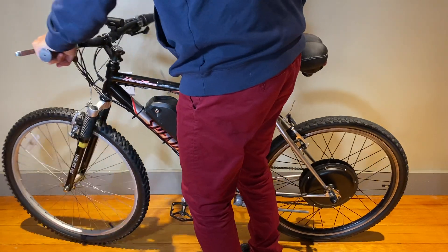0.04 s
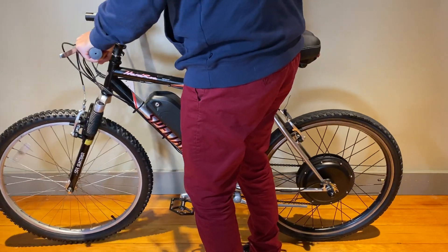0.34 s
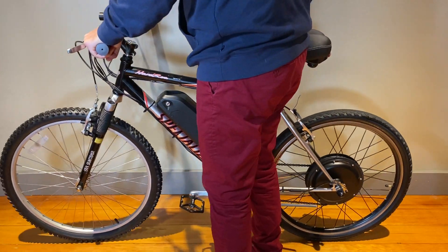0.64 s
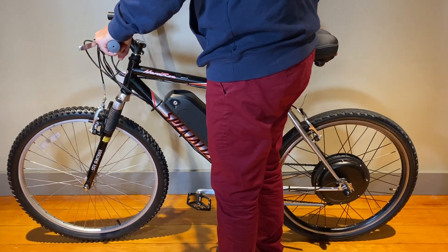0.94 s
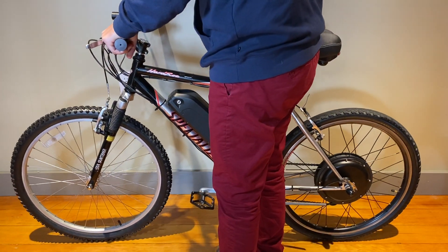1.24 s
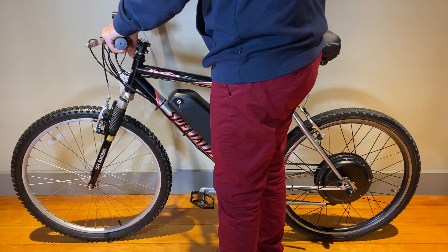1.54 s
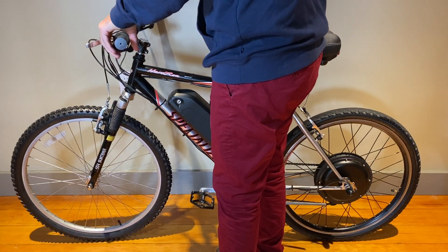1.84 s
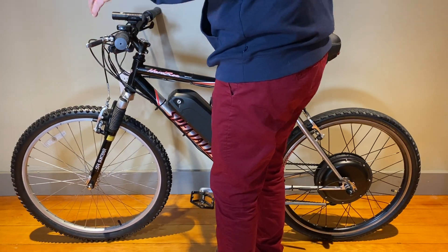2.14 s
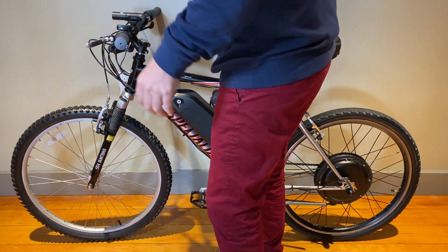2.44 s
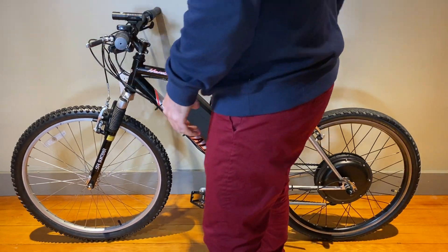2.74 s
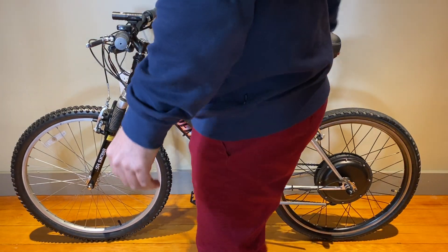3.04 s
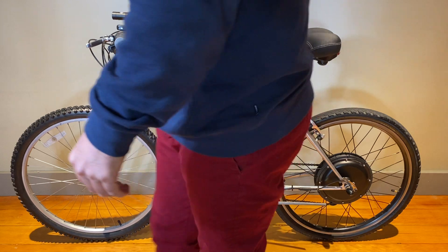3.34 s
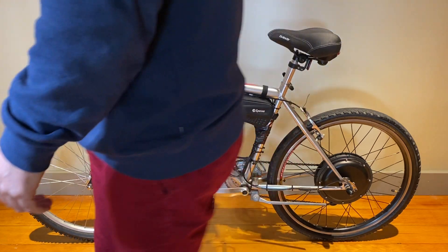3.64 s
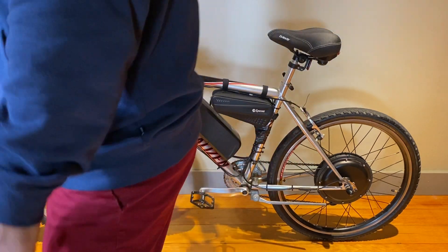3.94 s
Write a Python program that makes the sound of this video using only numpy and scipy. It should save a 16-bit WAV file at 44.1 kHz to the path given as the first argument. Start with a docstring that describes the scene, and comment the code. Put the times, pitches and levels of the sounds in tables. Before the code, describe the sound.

A bicycle bumps against a wall with a thud and a metallic tick, then settles with faint creaks. After a softer bump, someone steps away on wooden boards, clothes rustling nearby, ending with a hard shoe clack.

```python
"""Over the low rumble of a room with a wooden floor, a bicycle is leaned on a wall: the handlebar bumps,
the frame and the boards ring in their modes, and a metal part ticks. The frame settles with faint creaks
and rattles, and two softer bumps follow. The rider lets go, a sleeve sliding with a faint whistle, and
steps away in clothes that rustle by friction. Soft steps make the boards boom, and the last one lands
with a hard clack that rings a plank."""
import sys
import numpy as np
from scipy import signal
from scipy.fft import rfft, irfft, next_fast_len
from scipy.io import wavfile
from scipy.ndimage import map_coordinates

SR = 44100
rng = np.random.default_rng(int(sys.argv[2]) if len(sys.argv) > 2 else 0)


def wav_out(sig):
    """Save sig, one row per channel (or a flat mono array), as 16-bit PCM at SR to the path in sys.argv[1]."""
    wavfile.write(sys.argv[1], SR, np.round(np.clip(np.atleast_2d(sig).T, -1, 1) * 32767).astype(np.int16))


N = 176400

# handlebar blows (time [s], level [dB], treble corner [Hz], frame ring [dB], floor boom [dB])
HANDLEBAR_BUMPS = [(0.1644, -36.5, 2870, -39, -45.5), (0.206, -41, 3500, -48.5, -66),
                   (2.207, -48.5, 1240, -73, -77), (2.228, -45, 980, -64, -74)]
# soft footfalls (time [s], level [dB], treble corner [Hz], floor boom [dB])
SOFT_STEPS = [(2.5408, -34.5, 307, -46.5), (2.692, -47, 170, -43.5), (2.934, -53.5, 200, -56),
              (3.5, -33.5, 376, -46)]
# hollow note of a sole landing (frequency [Hz], level [dB], t60 [s])
SOLE_MODES = [(201.5, -3.5, 0.18), (257.8, 2, .24), (285, 1, 0.19), (379.4, -6.5, 0.15)]
# hard shoe contacts (time [s], level [dB], floor boom [dB])
SHOE_CLACKS = [(3.7621, -37.5, -63), (3.7638, -27, -40.5)]


def amp(db):
    """Decibels to amplitude ratio."""
    return 10 ** (np.asarray(db) / 20)


def unit(x):
    """Normalise to rms 1."""
    return x / np.sqrt(np.mean(x ** 2) + 1e-20)


def pan(left_db):
    """Level difference: stereo gains with the left louder by left_db."""
    return amp([[left_db / 2], [-left_db / 2]])


def along(points, hz):
    """Interpolate (frequency [Hz], value) points on a logarithmic frequency axis."""
    knots_hz, values = np.transpose(points)
    return np.interp(np.log(hz + 1), np.log(knots_hz + 1), values)


def wobble(rate):
    """Random modulation: a smooth curve with rate knots a second."""
    knots = rng.standard_normal(int(N * rate / SR) + 4)
    return map_coordinates(knots, [np.arange(N) * rate / SR])


def coloured(x, gain_db):
    """Minimum-phase filtering: folding the cepstrum makes the response gain_db(hz) causal."""
    size = 2 * next_fast_len(x.shape[-1])
    hz = np.fft.rfftfreq(size, 1 / SR)
    cepstrum = irfft(np.log(amp(gain_db(hz)) + 1e-6), size)
    cepstrum[1:size // 2] *= 2
    cepstrum[size // 2 + 1:] = 0
    return irfft(rfft(x, size) * np.exp(rfft(cepstrum)), size)[..., :x.shape[-1]]


def diffuse(size):
    """Diffuse field: stereo noise, coherent in the bass and largely unrelated in the treble."""
    # likeness of left and right (frequency [Hz], correlation [ratio])
    coherence = [(60, 0.92), (150, 0.88), (280, 0.73), (550, 0.26), (2000, 0.14), (5000, 0.36),
                 (9000, 0.25), (15000, 0.27)]
    angle = np.arccos(np.clip(along(coherence, np.fft.rfftfreq(size, 1 / SR)), -1, 1)) / 2
    mid, side = irfft(rfft(rng.standard_normal((2, size))) * [np.cos(angle), np.sin(angle)], size)
    return np.array([mid + side, mid - side])


def shaped_noise(spectrum):
    """Source and filter: diffuse noise given a spectrum, at rms 1."""
    return unit(coloured(diffuse(N), lambda hz: along(spectrum, hz)))


def add(out, time, x):
    """Superposition: mix x into out from the given time."""
    start = int(np.clip(round(time * SR), 0, N - 1))
    out[:, start:start + x.shape[-1]] += x[..., :N - start]


def contact(gain_db, ring_t60, ring_db, room_db, pan_db):
    """Impulse response of a blow: a pulse, the body's short dense ring and the room's reverberation."""
    # reverberation time of the room (frequency [Hz], t60 [s])
    room_t60 = [(60, 0.93), (200, 0.56), (500, 0.6), (1200, 0.6), (3000, 0.39), (7000, 0.46), (15000, 0.14)]
    t = np.arange(SR) / SR
    hz, frame_times, spectra = signal.stft(diffuse(SR), SR, nperseg=256)
    decay = amp(-60 * frame_times / along(room_t60, hz)[:, None])
    tail = signal.istft(spectra * decay, SR, nperseg=256)[1][:, :SR]
    tail *= 1 - np.exp(-t / 0.002)
    ring = diffuse(SR) * amp(-60 * t / ring_t60)
    blow = (amp(ring_db) * unit(ring) + amp(room_db) * unit(tail)) / np.sqrt(SR)
    blow[:, 0] += 1  # the direct pulse
    return unit(coloured(blow, gain_db)) * pan(pan_db) / np.sqrt(50)  # energy of 20 ms at rms 1


def softened(spectrum, hz, corner_hz):
    """Compliance: a soft contact loses 12 dB an octave above the corner."""
    return along(spectrum, hz) - 10 * np.log10(1 + (hz / corner_hz) ** 4)


def ringing(modes, rise_s):
    """Free vibration: damped modes swell briefly, each with about 1 dB of random spread."""
    t = np.arange(SR) / SR
    partials = (amp(db + rng.normal(0, 1) - 60 * t / t60) * np.sin(2 * np.pi * hz * t)
                for hz, db, t60 in modes)
    return sum(partials) * (1 - np.exp(-(t / rise_s) ** 2))


def room_tone():
    """Stationary noise: the steady low rumble of the room."""
    # rumble spectrum (frequency [Hz], gain [dB])
    rumble_spectrum = [(15, -47.5), (25, -20), (43, -8), (57, 1.5), (75, -8.5), (97, -2), (150, -10),
                       (250, -10.5), (400, -19.5), (600, -23.5), (840, -21), (1400, -43), (4000, -53.5),
                       (16000, -47.5)]
    return amp(-64.5) * pan(2.2) * shaped_noise(rumble_spectrum)


def clothes():
    """Friction noise: sleeves and trousers rub with a fine grain, a little to the left."""
    # rustle envelope (time [s], level [dB])
    rustle_levels = [(0, -62.5), (.14, -66.5), (.28, -67), (.45, -71), (.8, -77), (1.3, -79.5),
                     (2.039, -78), (2.17, -72), (2.36, -70), (2.55, -68.5), (2.74, -69), (2.87, -61.5),
                     (3.13, -68), (3.311, -69), (3.46, -64), (3.6, -61.5), (3.74, -50.5), (3.85, -51),
                     (4.0, -56)]
    # spectrum of rubbing cloth (frequency [Hz], gain [dB])
    cloth_spectrum = [(100, -5.5), (400, 13.5), (1000, 8.5), (2000, 1), (4000, -2.5), (6500, -5),
                      (10000, -13.5), (14500, -11.5), (16000, -22)]
    times, levels = np.transpose(rustle_levels)
    grain_db = 0.6 * wobble(25) + 0.9 * wobble(300)
    envelope = amp(np.interp(np.arange(N) / SR, times, levels) + grain_db)
    return envelope * shaped_noise(cloth_spectrum) * pan(2.5)


def handlebar():
    """Impact excitation: the handlebar thuds on the wall and sets the frame's modes ringing."""
    # spectrum of the thud (frequency [Hz], gain [dB])
    bump_spectrum = [(40, -11.5), (110, -4.5), (280, 0), (450, -6), (850, -3.5), (1200, -10.5),
                     (2200, -12.5), (3500, -21.5), (8000, -30), (16000, -72)]
    # bicycle frame modes (frequency [Hz], level [dB], t60 [s])
    frame_modes = [(137.3, 0.5, 0.42), (281.4, 1, 0.34), (366, -7, 0.2), (522, -34, 0.51), (800, -43, 0.52),
                   (815, -8.5, .3), (865, -12, 0.46), (1320, -16, 0.27), (1702, -10, 0.2),
                   (2234, -29, 0.18), (2700, -23.5, 0.24), (3530, -23, 0.19)]
    out = np.zeros((2, N))
    for time, db, corner_hz, frame_db, _ in HANDLEBAR_BUMPS:
        thud = contact(lambda hz: softened(bump_spectrum, hz, corner_hz),
                       ring_t60=0.12, ring_db=9.5, room_db=10, pan_db=0.6)
        add(out, time, amp(db) * thud + amp(frame_db) * ringing(frame_modes, rise_s=0.0091))
    return out


def boards():
    """Resonance: blows and shifts of weight make the floor boom, and the boards give under load."""
    # weight shifts that only stir the boards (time [s], floor boom [dB])
    shifts = [(.47, -60), (0.883, -63.5), (1.63, -58), (1.879, -65), (3.159, -58.5), (3.342, -65)]
    # floor modes (frequency [Hz], level [dB], t60 [s])
    floor_modes = [(58.5, -5.5, .75), (95.5, 3, 0.51), (136.6, -5.5, 0.72), (166.34, -3, 0.56),
                   (249, -12.5, 0.83)]
    # weight coming down after a blow (time [s], level [dB])
    loads = [(0.167, -44), (0.2, -48), (2.566, -49), (2.71, -59), (3.523, -39), (3.793, -58)]
    # the boards giving under it (frequency [Hz], level [dB], t60 [s])
    loaded_modes = [(101.5, 8.5, 0.18), (121, -10, 0.17), (60.4, -24, 0.66)]
    out = np.zeros((2, N))
    for time, *_, boom_db in HANDLEBAR_BUMPS + SOFT_STEPS + SHOE_CLACKS + shifts:
        add(out, time, amp(boom_db) * ringing(floor_modes, rise_s=0.0051))
    for time, db in loads:
        add(out, time, amp(db) * ringing(loaded_modes, rise_s=0.0059))
    return out


def metal_tick():
    """Inharmonic vibration: a struck metal part ticks and rings in high modes."""
    # strike on the metal (time [s], level [dB])
    ticks = [(0.2059, -40)]
    # spectrum of the tick (frequency [Hz], gain [dB])
    tick_spectrum = [(300, -41), (3000, -16.5), (5000, -20), (6500, -14), (7600, -17.5), (9800, -12),
                     (11000, -23), (14000, -2.5), (16000, -6)]
    # modes of the part (frequency [Hz], level [dB], t60 [s])
    metal_modes = [(2730, -25, 0.25), (3440, -19.5, 0.33), (3570, -23.5, 0.29), (6460, -21, 0.32),
                   (6800, -28, 0.35), (9959, -19, 0.15), (13900, -10, .16), (14090, -15, 0.13)]
    out = np.zeros((2, N))
    for time, db in ticks:
        crack = contact(lambda hz: along(tick_spectrum, hz),
                        ring_t60=0.29, ring_db=13, room_db=18.5, pan_db=2)
        add(out, time, amp(db) * (crack + ringing(metal_modes, rise_s=0.001)))
    return out


def rattles():
    """Band-limited transients: faint creaks and rattles, each in a band of its own."""
    # small contacts (time [s], level [dB], centre [Hz], half-width [octaves])
    small_contacts = [(.392, -56.5, 2040, 0.37), (.425, -73, 2400, 0.66), (0.474, -66.5, 1430, 0.3),
                      (.745, -76.5, 2450, 1.2), (1.0177, -72.5, 980, 0.67), (2.689, -54.5, 970, 0.68),
                      (3.0, -63.5, 3240, 0.65), (3.04, -82, 3500, 0.49), (3.704, -54.5, 1400, .9),
                      (3.724, -49, 1010, 0.78), (3.965, -54, 850, 0.66)]
    out = np.zeros((2, N))
    for time, db, centre_hz, octaves in small_contacts:
        band_db = lambda hz: -14 * np.log10(1 + (np.log2((hz + 1) / centre_hz) / octaves) ** 4)
        add(out, time, amp(db) * contact(band_db, ring_t60=0.04, ring_db=0, room_db=4, pan_db=2.5))
    return out


def swishes():
    """Sliding friction: short strokes of hand and sleeve swell and fade as noise."""
    # strokes (peak time [s], half-width [s], level [dB])
    strokes = [(2.215, 0.022, -72), (2.255, 0.052, -67.5), (2.618, 0.08, -67.5), (2.894, 0.054, -74),
               (3.035, .04, -67), (3.647, 0.088, -64.5)]
    # spectrum of a stroke (frequency [Hz], gain [dB])
    swish_spectrum = [(300, -6), (1500, 4), (3500, -5), (6000, -4.5), (9000, -20.5), (14500, -21),
                      (16000, -8)]
    t = np.arange(N) / SR
    envelope = sum(amp(db) * np.exp(-((t - peak) / width) ** 2) for peak, width, db in strokes)
    grain = amp(1.1 * wobble(250))
    return envelope * grain * shaped_noise(swish_spectrum)


def sleeve_whistle(half_band_hz=380):
    """Narrow-band friction noise: a sliding sleeve whistles faintly, falling in pitch as it slows."""
    # course of the whistle (time [s], centre [Hz], level [dB])
    glide = [(2.221, 4250, -105), (2.254, 4020, -70), (2.33, 3770, -83), (2.45, 3430, -80),
             (2.619, 3340, -77), (2.75, 3120, -100)]
    t = np.arange(N) / SR
    times, centres, levels = np.transpose(glide)
    phase = 2 * np.pi * np.cumsum(np.interp(t, times, centres)) / SR
    rate = 2 * half_band_hz
    band = np.array([wobble(rate) * np.cos(phase) + wobble(rate) * np.sin(phase) for _ in range(2)])
    return amp(np.interp(t, times, levels)) * unit(band)


def soft_steps():
    """Compliant impact: a soft sole gives a dull thud with a hollow note."""
    # spectrum of a footfall (frequency [Hz], gain [dB])
    step_spectrum = [(40, -29), (100, -9), (180, -2), (270, -0.5), (420, -4), (560, -11.5), (850, -11.5),
                     (1500, -19), (4000, -11.5), (16000, -22)]
    out = np.zeros((2, N))
    for time, db, corner_hz, _ in SOFT_STEPS:
        thud = contact(lambda hz: softened(step_spectrum, hz, corner_hz),
                       ring_t60=0.19, ring_db=13, room_db=9, pan_db=1.2)
        add(out, time, amp(db) * (thud + amp(-4.5) * ringing(SOLE_MODES, rise_s=0.014)))
    return out


def shoe_clack(sole_delay_s=0.01016):
    """Hard impact: the shoe's edge gives a broadband pulse that rings a plank, then the sole lands flat."""
    # spectrum of the clack (frequency [Hz], gain [dB])
    clack_spectrum = [(40, -46), (100, -3), (190, -1.5), (300, 1.5), (435, -3), (560, -1), (850, -5),
                      (1120, 0), (1500, -7), (2350, -7), (3000, -9.5), (3700, -9.5), (5200, -16.5),
                      (7300, -18.5), (11000, -27.5), (16000, -27.5)]
    # plank modes (frequency [Hz], level [dB], t60 [s])
    plank_modes = [(434.6, 1.5, 0.4), (763, -8, 0.32), (850, 5, 0.048), (1051, -3, .4), (1116, -3, 0.27),
                   (1139, -0.5, 0.27), (1162, 12.5, 0.023), (1294, -10, 0.55), (2333, -6, 0.15),
                   (2440, 6, .018), (3370, -25, .38), (4330, -16, .3)]
    out = np.zeros((2, N))
    for time, db, _ in SHOE_CLACKS:
        crack = contact(lambda hz: along(clack_spectrum, hz),
                        ring_t60=0.08, ring_db=1.5, room_db=5, pan_db=3)
        add(out, time, amp(db) * (crack + amp(-13.5) * ringing(plank_modes, rise_s=0.00043)))
        add(out, time + sole_delay_s, amp(db - 11.5) * ringing(SOLE_MODES, rise_s=0.004))
    return out


def scene():
    """Superposition: the pressures of all sources add."""
    impacts = handlebar() + metal_tick() + soft_steps() + shoe_clack() + boards() + rattles()
    friction = clothes() + swishes() + sleeve_whistle()
    return impacts + friction + room_tone()


def record(dry, left_lead_s=2.5e-5, band_limit_hz=15900):
    """Path difference: the left microphone hears first; the ports notch the band-limited treble."""
    # microphone response (frequency [Hz], gain [dB])
    mic_response = [(20, 0), (7500, -3.5), (8500, -8), (9500, -0.5), (11000, -3), (12100, -20.5),
                    (13000, -5), (14400, -2.5), (15200, -3.5), (16000, -12)]
    size = next_fast_len(N + SR // 2)
    hz = np.fft.rfftfreq(size, 1 / SR)
    lead = np.exp(1j * np.pi * hz * left_lead_s * np.array([[1], [-1]]))
    notched = coloured(dry, lambda hz: along(mic_response, hz))
    return irfft(rfft(notched, size) * lead * (hz < band_limit_hz), size)[:, :N]


dry = scene()
out = record(dry)
wav_out(out)
```